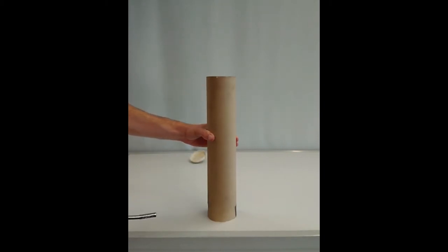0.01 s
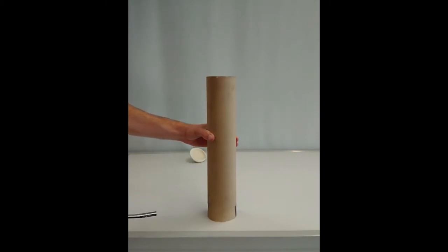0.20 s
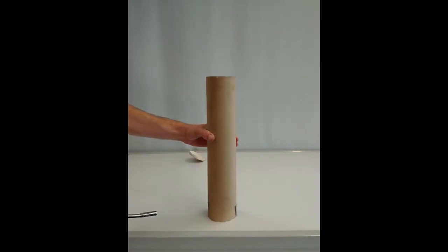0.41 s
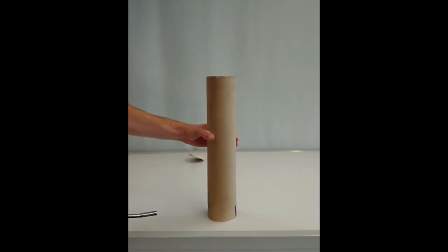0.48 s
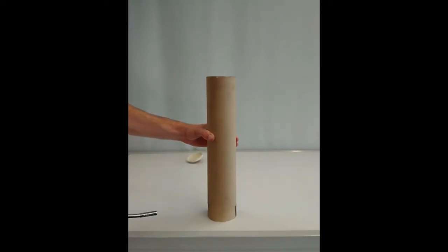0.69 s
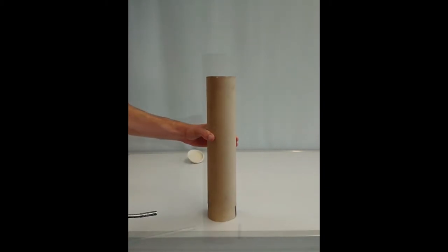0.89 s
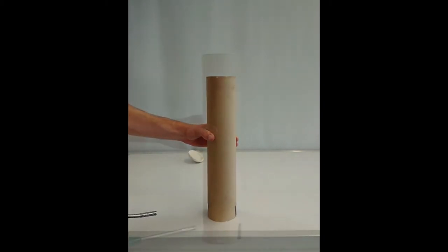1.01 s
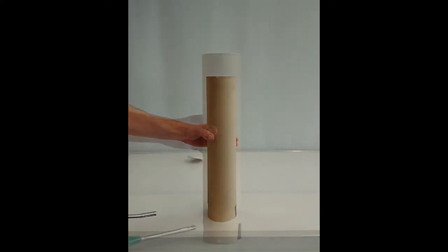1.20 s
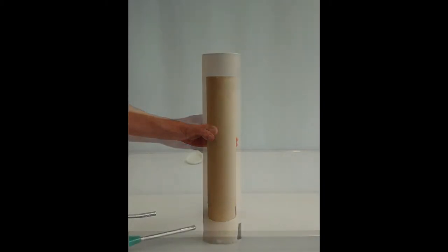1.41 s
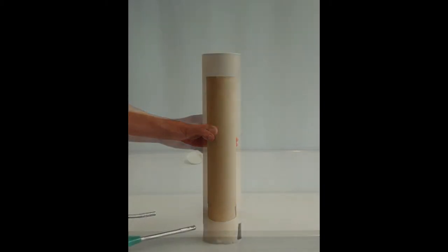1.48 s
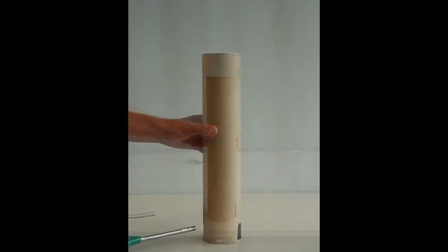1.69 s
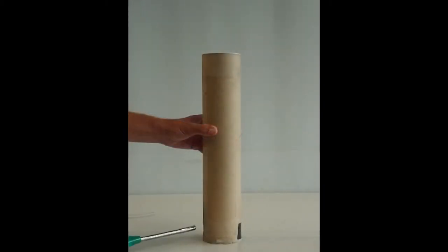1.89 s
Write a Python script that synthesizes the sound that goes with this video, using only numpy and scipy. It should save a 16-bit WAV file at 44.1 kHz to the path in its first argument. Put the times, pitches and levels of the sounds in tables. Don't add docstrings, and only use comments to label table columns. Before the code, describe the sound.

After a brief quiet, a loud slowed blast cracks from a tube, followed by scattered hard echoes and a long hollow room ring that fades into faint machine murmur; close stereo pickup, dulled treble.

```python
import sys
import numpy as np
from scipy import signal
from scipy.io import wavfile
from scipy.ndimage import uniform_filter1d

SR = 44100
rng = np.random.default_rng(int(sys.argv[2]) if len(sys.argv) > 2 else 0)


def linear_from_db(decibels):
    return 10 ** (np.asarray(decibels, float) / 20)


def unload_audio(sound):
    columns = np.transpose(np.atleast_2d(sound))
    steps = np.round(np.clip(columns, -1, 1) * 32767)
    wavfile.write(sys.argv[1], SR, steps.astype(np.int16))


N = 83790
TIME = np.arange(N) / SR
POP_S = 0.2408

# frequency in Hz, level in dB per Hz.
AIR_COLOUR = [(12, -45.5), (20, -7.5), (103, -5.5), (168, -18.5), (793, -26), (866, -16), (1410, -38.5),
              (2630, -37.5), (4000, -44), (5200, -67.5), (8800, -120)]
# time in seconds, level in dB.
AIR_FADE = [(0.951, 14.5), (1.499, 6.5), (1.9, 4)]
# frequency in Hz, width in Hz, level in dB.
MACHINE_HUM = [
    (334, 56, -74),
    (552, 360, -72),
    (209, 73, -82.5),
    (70, 110, -75.5),
]
# frequency in Hz, likeness from -1 to 1.
LIKENESS = [(30, 1), (65, 0.36), (110, -0.31), (180, -0.012), (500, -0.023), (1500, -0.099), (4000, 0.041)]
# frequency in Hz, left over right in dB.
SIDE_LEAN = [(60, -2), (240, -7), (950, -0.5), (3770, 0), (15000, -1)]
# frequency in Hz, level in dB per Hz.
ROOM_COLOUR = [(15, -41.5), (25, -15.5), (96, -14), (153, -12), (216, -5.5), (401, -7.5), (683, -3.5),
               (1670, -8.5), (4100, -28.5), (5330, -56), (9020, -120)]
# frequency in Hz, width in Hz, boost in dB (negative for a
ROOM_BANDS = [(232, 35, 1.5), (644, 260, 4), (1175, 120, 4.5), (1332, 180, -7.5), (1696, 310, 1.5),
              (154, 140, 0.5)]
# frequency in Hz, time to fall 60 dB in seconds.
ROOM_T60 = [(60, 2), (250, 2.285), (700, 2.597), (1500, 3.04), (3000, 2.58), (4000, 1.81)]
# frequency in Hz, spread in dB.
LINE_SPREAD = [(100, 3), (700, 1), (1500, 3), (2500, 3), (4000, 6.5)]
# frequency in Hz, share of the time from 0 to 1.
DROPOUTS = [(2400, .001), (2800, 0.049), (3500, 0.16), (3850, 0.39), (4000, 0.32)]
# start in seconds, level in dB, frequency in Hz, time to fall 60 dB in seconds.
CAP_TICKS = [
    (1.5717, -53, 233, 0.066),
    (1.574, -52, 516, .014),
    (1.5745, -56, 800, .012),
    (1.5885, -58, 600, .012),
    (1.7697, -46, 430, 0.009),
    (1.7687, -49, 600, 0.011),
]
# centre in seconds, level in dB, frequency in Hz, half length in seconds.
TUBE_SWELLS = [
    (0.256, -39, 95, 0.031),
    (0.33, -51, 92, 0.01),
    (0.44, -49, 103, 0.02),
    (0.486, -49.5, 92, 0.027),
    (0.67, -57.5, 95, 0.013),
    (0.745, -55, 98, 0.026),
    (0.85, -55, 105, 0.018),
    (0.982, -58.5, 100, 0.013),
    (1.07, -66.5, 100, 0.068),
    (1.22, -70, 92, 0.025),
]
# frequency in Hz, level in dB, time to fall 60 dB in seconds,
# left over right in dB.
TUBE_THUMP = [
    (261.7, -30.5, 0.16, -4),
    (357, -39, 0.14, -3.5),
    (461, -30.5, .15, -10),
    (204, -41, 0.18, 1),
    (705.5, -28, 0.047, -0.5),
    (826, -39.5, 0.087, 7.5),
    (1153, -33.5, 0.29, 9.5),
]
# start in seconds, level in dB, left over right in dB,
# delay of left behind right in milliseconds, pitch in Hz.
SLAPS = [(.2410, -5, -.5, .4, 720), (.2549, -15, 0, .1, 1100), (.2555, -13, 14, 0, 860),
         (.2553, -19, -12, 0, 1250), (.2581, -17, 7, .2, 1150), (.2648, -18, 3, .3, 720),
         (.2747, -12, 3, -1.7, 1700), (.2760, -19, 3, -.5, 1100), (.2775, -21, 0, .1, 700),
         (.3021, -16, -8, 1.4, 2000), (.3028, -23, -6, 1.2, 600), (.3061, -27, -5, .6, 620),
         (.3328, -18, -3, 1.2, 1800), (.3340, -17, -2, .1, 500), (.3380, -20, 0, .2, 540),
         (.3390, -24, 0, .2, 1030), (.3665, -18, 1, -1.5, 700), (.3675, -25, 1, -.5, 1150),
         (.3880, -25, 3, .2, 900), (.3930, -20, -3, .8, 720), (.3990, -25, -2, .5, 640),
         (.4430, -23, 0, .5, 740), (.4510, -23, -2, .5, 680), (.4670, -24, 1, .3, 480),
         (.4725, -25, 1, 1.1, 560), (.4920, -26, 1, .1, 660), (.5020, -27, 2, .1, 1150),
         (.5380, -27, -1, .1, 620), (.5650, -27, 0, .1, 720), (.6580, -28, -1, .1, 670),
         (.7300, -30, 0, .1, 720)]
SLAP_SIGNS = [-1, -1, 1, 1, 1, 1, -1, -1, 1, -1, -1, 1, 1, -1, 1, 1, -1, 1, 1, -1, 1, 1, -1, -1, 1, 1, -1,
              1, -1, 1, -1]
# frequency in Hz, level in dB, decay in seconds.
RIM_SNAP = [
    (1150, -22.5, 0.0012),
    (1680, -22.5, 0.00078),
    (2070, -25, 0.00081),
    (2820, -26, 0.0018),
]
# time in seconds, level in dB.
CLOSING_FADE = [(.95, 5), (1.301, 4.5), (1.598, 0), (1.72, -3.5), (1.82, -7), (1.9, -18)]


def evened(x):
    return x / np.sqrt(np.mean(x ** 2) + 1e-20)


def read(points, hz):
    f, value = np.transpose(points)
    return np.interp(np.log(hz + 1), np.log(f + 1), value)


def diffuse(field, size):
    hop = size // 4
    hz = np.fft.rfftfreq(size, 1 / SR)
    t = np.arange(N // hop + 2) * hop / SR
    a, b, c, d = rng.standard_normal((len(t), len(hz), 4)).T
    left, other = a + 1j * b, c + 1j * d
    same = np.clip(read(LIKENESS, hz), -1, 1)[:, None]
    right = same * left + np.sqrt(1 - same ** 2) * other
    z = np.array([left, right]) * linear_from_db(field(hz, t))
    z = z * linear_from_db(np.outer([0.5, -0.5], read(SIDE_LEAN, hz)))[:, :, None]
    return signal.istft(z, nperseg=size, noverlap=size - hop)[1][:, :N]


def fuzzy(hz, width_hz):
    r = np.exp(-np.pi * width_hz / SR)
    slow = rng.standard_normal((N, 2)) @ [1, 1j]
    for _ in range(2):
        slow = signal.lfilter([1 - r], [1, -r], slow)
    return evened((slow * np.exp(2j * np.pi * hz * TIME)).real)


def ring(start, hz, t60, rise):
    t = np.maximum(TIME - start, 0)
    return np.sin(2 * np.pi * hz * t) * linear_from_db(-60 * t / t60) * (1 - np.exp(-t / rise))


def air():
    noise = evened(diffuse(lambda hz, t: read(AIR_COLOUR, hz)[:, None] + 0 * t, size=2048))
    whistle = linear_from_db(-27) * fuzzy(2620, width_hz=40)
    at, db = np.transpose(AIR_FADE)
    return linear_from_db(-78.5 + np.interp(TIME, at, db)) * (noise + whistle)


def hum():
    rise = np.clip((TIME - 1.406) / 0.11, 0, 1)
    fall = np.clip((1.923 - TIME) / 0.17, 0, 1)
    return rise * fall * sum(linear_from_db(db) * fuzzy(hz, width) for hz, width, db in MACHINE_HUM)


def dropouts(hz, t):
    band = (hz // 65).astype(int)
    block = ((t + 0.02) // 0.0853).astype(int)
    draw = rng.random((block[-1] + 1, band[-1] + 1)).T[band][:, block]
    silent = (draw < read(DROPOUTS, hz)[:, None]) & (t > 0.4)
    top_lost = (hz[:, None] > 4030) & (t > 1.17)
    return -26.5 * (silent | top_lost)


def room():
    def field(hz, t):
        colour = read(ROOM_COLOUR, hz)
        for f, width, db in ROOM_BANDS:
            colour = colour + db * np.exp(-((hz - f) / width) ** 2)
        chance = rng.standard_normal((len(t), len(hz), 2)).T
        lines = evened(uniform_filter1d(chance[0], size=10, axis=1))
        patches = uniform_filter1d(chance[1], size=20, axis=0)
        patches = evened(uniform_filter1d(patches, size=3, axis=1))
        uneven = read(LINE_SPREAD, hz)[:, None] * lines + 0.6 * patches
        decay = -60 * np.maximum(t - POP_S, 0) / read(ROOM_T60, hz)[:, None]
        return colour[:, None] + uneven + decay + dropouts(hz, t)

    tail = diffuse(field, size=2048)
    first = round(POP_S * SR)
    tail = tail / np.sqrt(np.mean(tail[:, first:first + 4000] ** 2))

    t = TIME - POP_S
    after = np.maximum(t, 0)
    flutter = rng.standard_normal((N, 2)).T
    flutter = flutter + flutter[::-1] * 0.5
    for _ in range(2):
        flutter = uniform_filter1d(flutter, size=300, axis=1)
    level_db = -32 - 5 * np.exp(-after / 0.2) + 0.4 * evened(flutter)
    build = (1 - np.exp(-after / 0.0028)) * linear_from_db(level_db)
    run_up = (t < 0) * linear_from_db(-42 + 1600 * np.minimum(t, 0))
    return (build + run_up) * tail


def cap():
    return sum(linear_from_db(db) * ring(s, hz, t60, rise=0.0009) for s, db, hz, t60 in CAP_TICKS)


def tube():
    drone = np.zeros(N)
    for s, db, hz, half_s in TUBE_SWELLS:
        swell = np.exp(-((TIME - s) / half_s) ** 2)
        drone += linear_from_db(db + 1.5) * swell * np.sin(2 * np.pi * hz * (TIME - POP_S))
    thump = np.zeros((2, N))
    for hz, db, t60, pan_db in TUBE_THUMP:
        sides = linear_from_db(db + pan_db * np.array([[0.5], [-0.5]]))
        thump += sides * ring(POP_S + 0.0034, hz, t60, rise=0.0021)
    return (TIME > POP_S) * drone * linear_from_db([[-1.5], [1.5]]) - thump


def slap_body(t, hz, late_s):
    cycles = min(0.85 + 11 * late_s, 1.64)
    body = np.sin(2 * np.pi * hz * t) * np.exp(-t * hz / cycles) * (1 - np.exp(-t * hz * 6))
    c = t / 0.0006
    body = body + linear_from_db(-11) * np.e * c * (1 - c) * np.exp(-2 * c)
    for f, db, decay_s in RIM_SNAP:
        level = linear_from_db(db - 57.5 * late_s)
        body = body + level * np.sin(2 * np.pi * f * t) * np.exp(-t / decay_s)
    return body


def slaps():
    out = np.zeros((2, N))
    u = np.arange(1500) / SR
    scatter_s = 0.007
    scatter = linear_from_db(-14) * np.exp(-u / scatter_s) / np.sqrt(scatter_s * SR / 10)
    spray = rng.standard_normal((len(SLAPS), 2, len(u)))
    for (s, db, pan_db, lag_ms, hz), sign, noise in zip(SLAPS, SLAP_SIGNS, spray):
        for side, half in enumerate((0.5, -0.5)):
            at = (s + half * lag_ms / 1000) * SR
            t = np.maximum(u - (at % 1) / SR, 0)
            body = slap_body(t, hz, s - POP_S)
            sound = body + signal.fftconvolve(body, scatter * noise[side])[:len(u)]
            start = int(at)
            out[side, start:start + len(u)] += sign * linear_from_db(db + half * pan_db) * sound * 0.75
    return signal.lfilter(*signal.butter(2, 210, "high", fs=SR), out)


def scene():
    at, db = np.transpose(CLOSING_FADE)
    fade = linear_from_db(np.interp(TIME, at, db))
    return (slaps() + room() + tube()) * fade + air() + cap() + hum()


def slow_replay(dry):
    edge = signal.firwin(1201, 4106, window=("kaiser", 10), fs=SR)
    low = signal.oaconvolve(dry, edge[None], "same")
    low = signal.resample_poly(low, 40, 147, axis=1)
    steps = np.arange(low.shape[1])
    joined = np.array([np.interp(np.arange(4 * len(steps)) / 4, steps, side) for side in low])
    joined = np.pad(joined, ((0, 0), (0, 320)), "edge")
    return signal.resample_poly(joined, 147, 160, axis=1)[:, :N]


def thinned(x):
    hz, _, z = signal.stft(x, SR, nperseg=2048, noverlap=1024)
    bands = (abs(z[:, :1024]) ** 2).mean(0).reshape(64, 16, -1).mean(1)
    top = hz[:1024:16] > 11500
    limit = np.maximum(bands[top].max(0) * linear_from_db(2 * -7.5), linear_from_db(2 * -113.5))
    keep = np.repeat(~top[:, None] | (bands > limit), 16, axis=0)
    z = z * np.vstack([keep, keep[-1:]])
    return signal.istft(z, SR, nperseg=2048, noverlap=1024)[1][:, :N]


def gap_hiss():
    noise = rng.standard_normal((N, 2)).T
    hiss = signal.lfilter(*signal.butter(2, (4100, 7600), "band", fs=SR), noise)
    return linear_from_db(-98.5 + 4 * (TIME - N / SR)) * evened(hiss)


def spill(dry):
    power = uniform_filter1d((dry ** 2).mean(0), size=500)
    burst = linear_from_db(-25.5) * np.maximum(power - linear_from_db(2 * -25), 0)
    return (linear_from_db(-99) + burst) * rng.standard_normal((N, 2)).T


def roll_off(x):
    return signal.sosfilt(signal.butter(12, 16480, fs=SR, output="sos"), x)


def record(dry):
    out = thinned(slow_replay(dry))
    out = out + gap_hiss() + spill(dry)
    return roll_off(out)


dry = scene()
out = record(dry)
unload_audio(out)
```